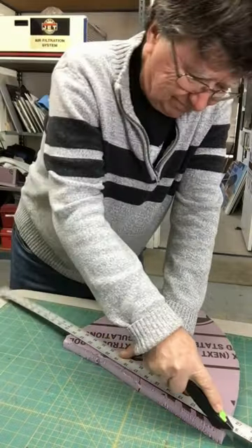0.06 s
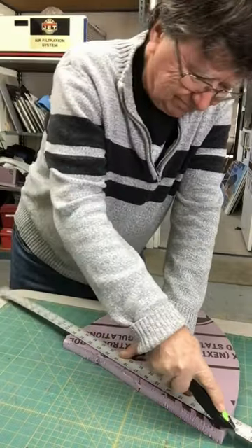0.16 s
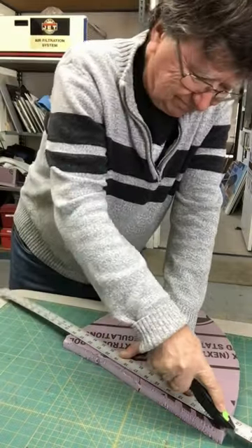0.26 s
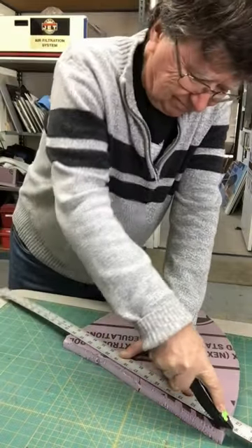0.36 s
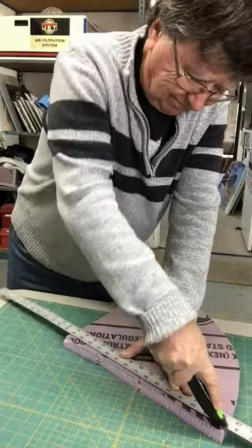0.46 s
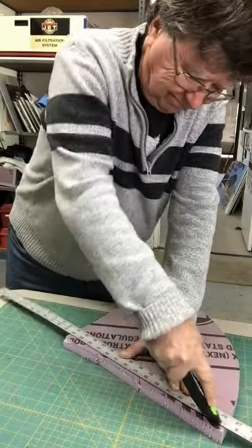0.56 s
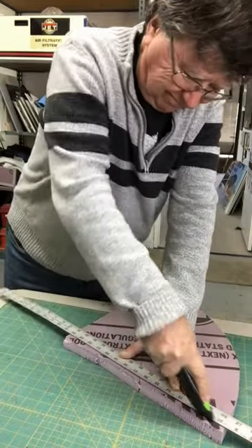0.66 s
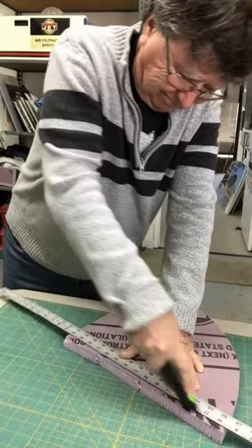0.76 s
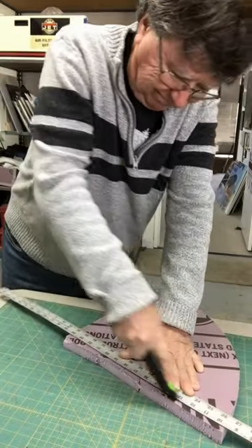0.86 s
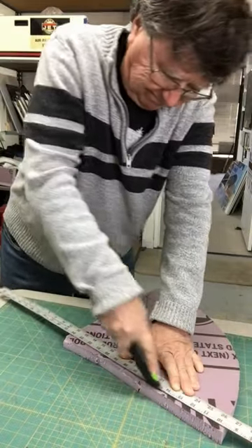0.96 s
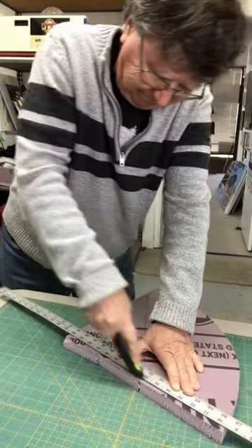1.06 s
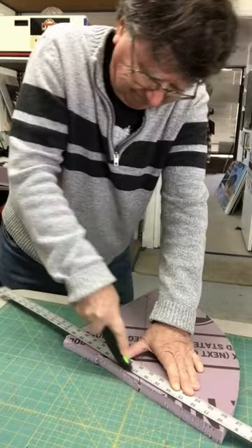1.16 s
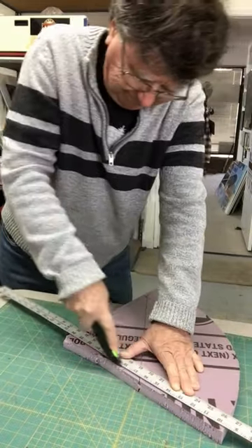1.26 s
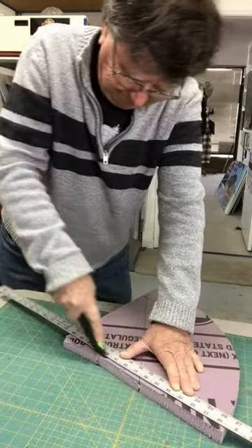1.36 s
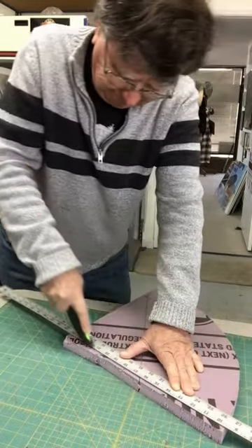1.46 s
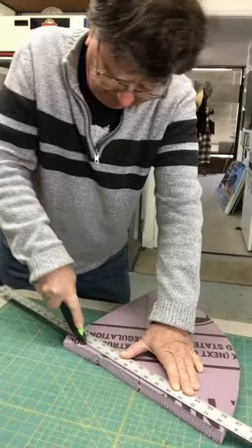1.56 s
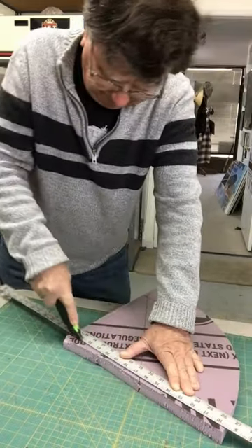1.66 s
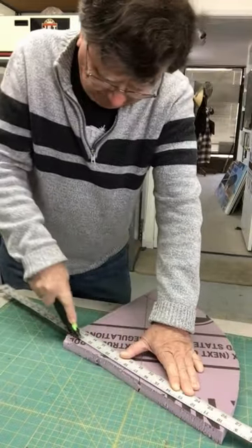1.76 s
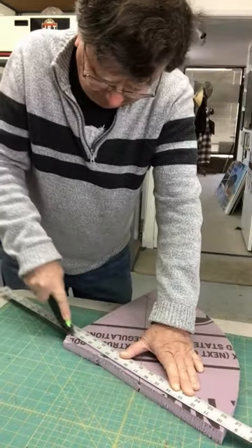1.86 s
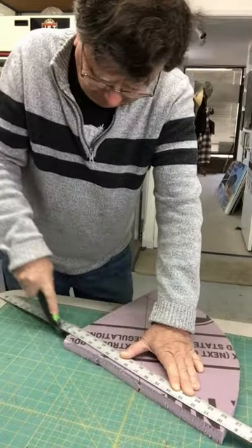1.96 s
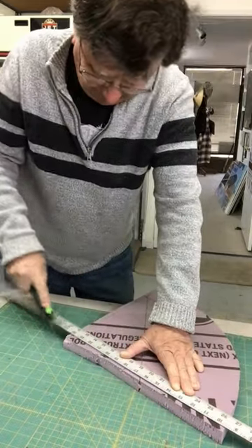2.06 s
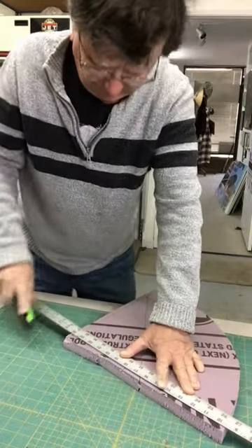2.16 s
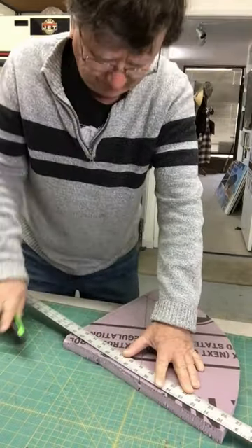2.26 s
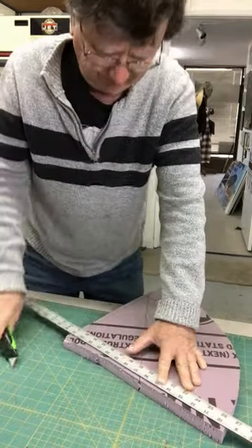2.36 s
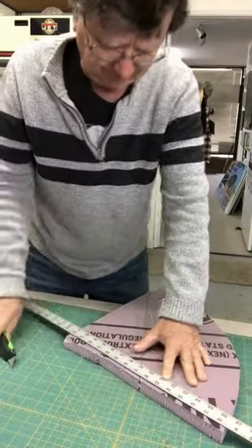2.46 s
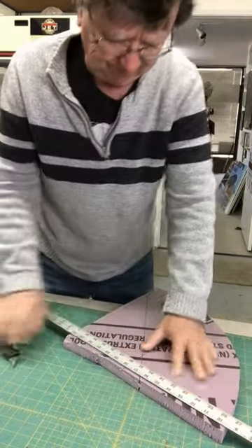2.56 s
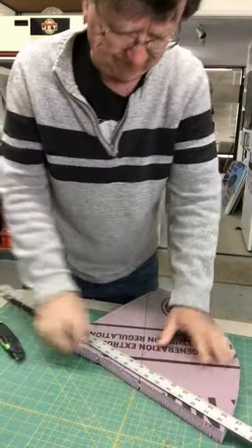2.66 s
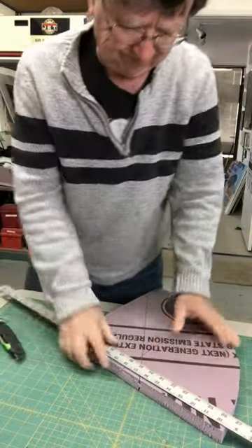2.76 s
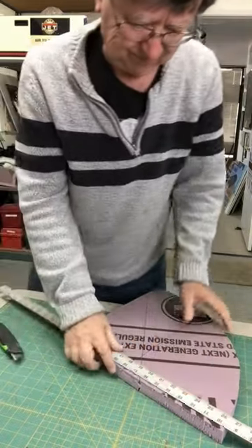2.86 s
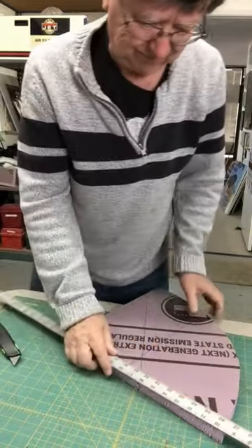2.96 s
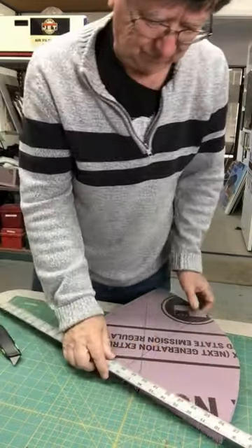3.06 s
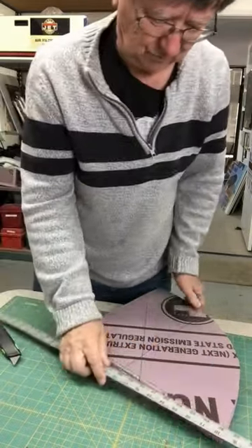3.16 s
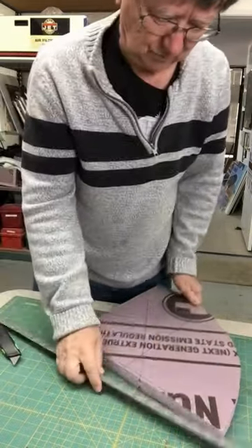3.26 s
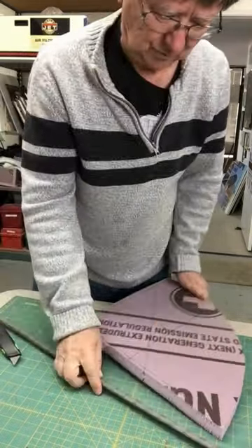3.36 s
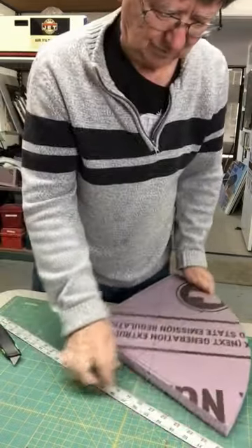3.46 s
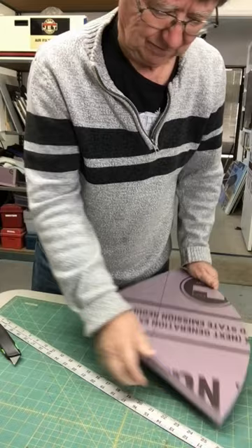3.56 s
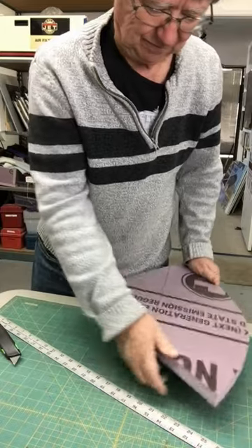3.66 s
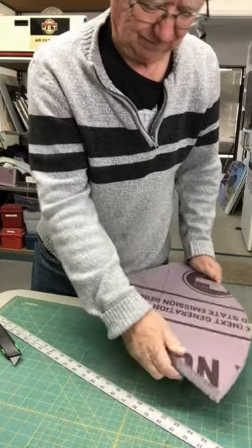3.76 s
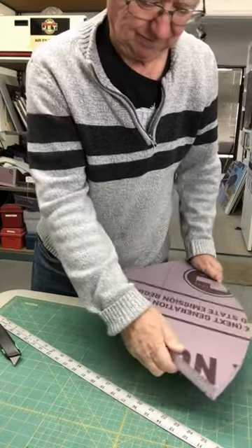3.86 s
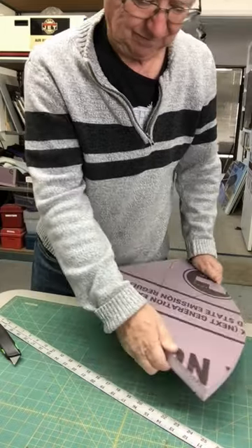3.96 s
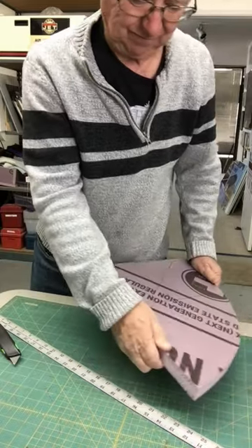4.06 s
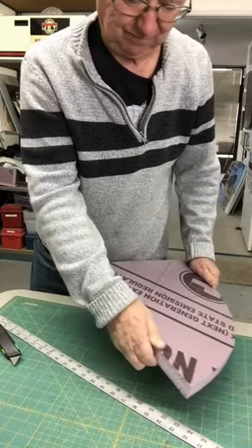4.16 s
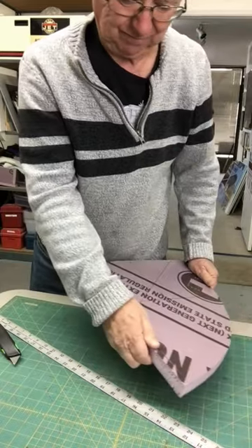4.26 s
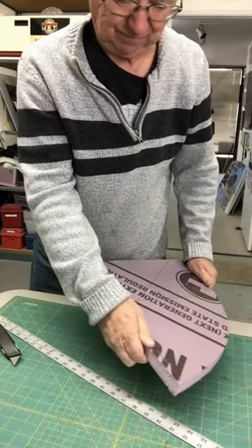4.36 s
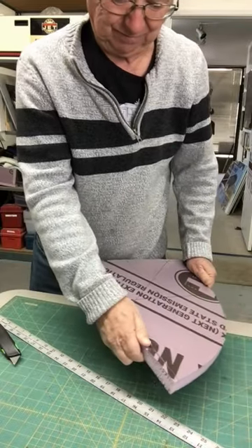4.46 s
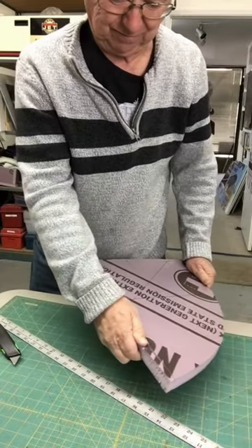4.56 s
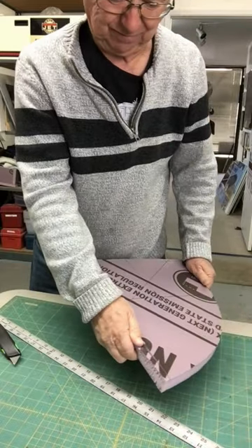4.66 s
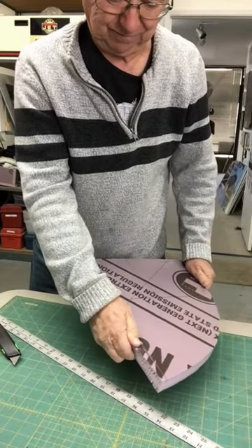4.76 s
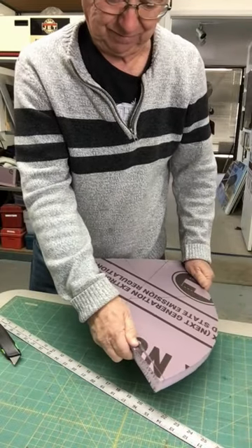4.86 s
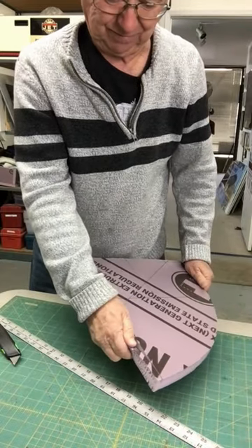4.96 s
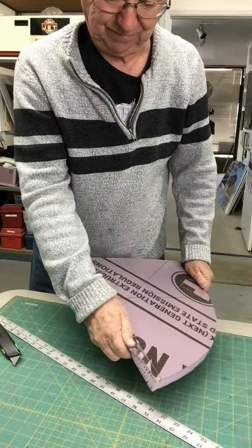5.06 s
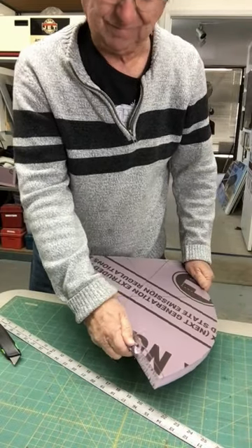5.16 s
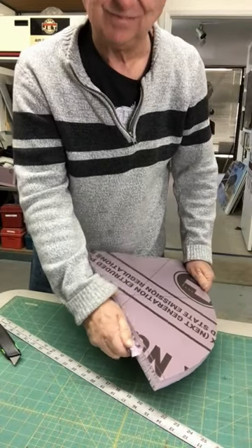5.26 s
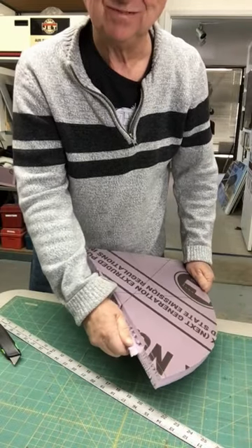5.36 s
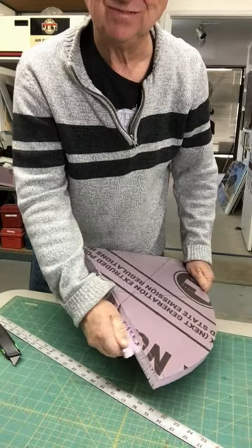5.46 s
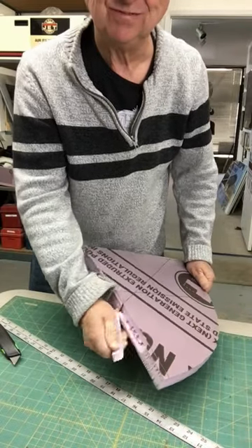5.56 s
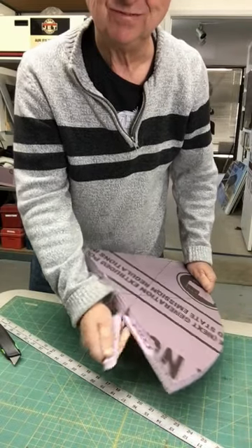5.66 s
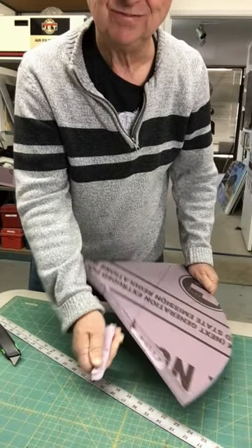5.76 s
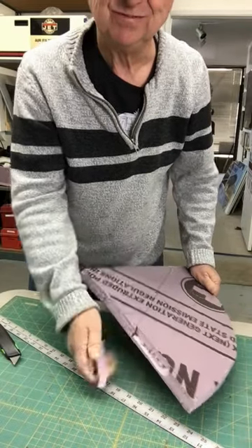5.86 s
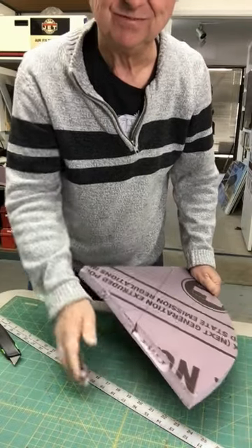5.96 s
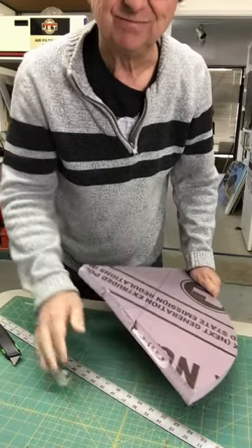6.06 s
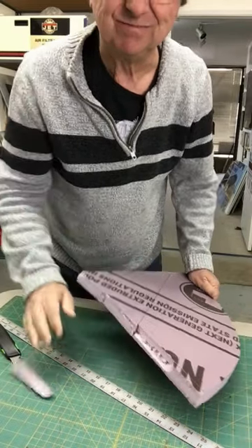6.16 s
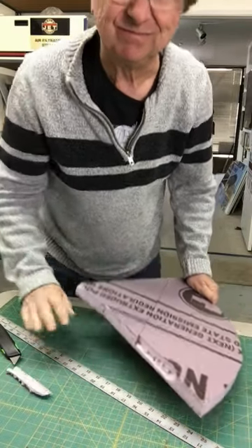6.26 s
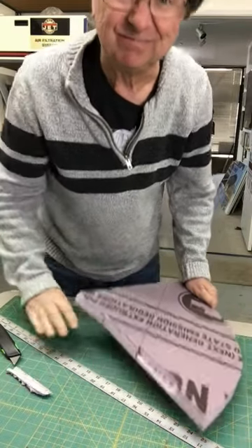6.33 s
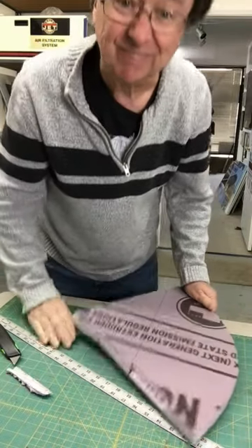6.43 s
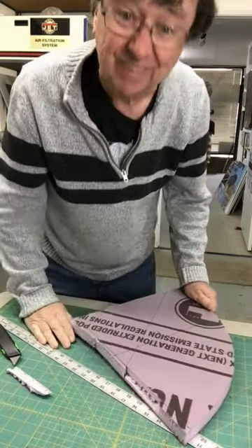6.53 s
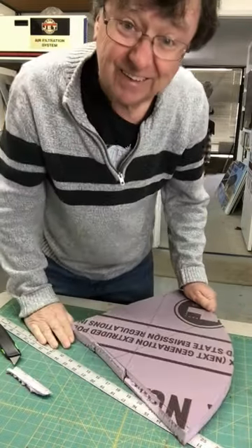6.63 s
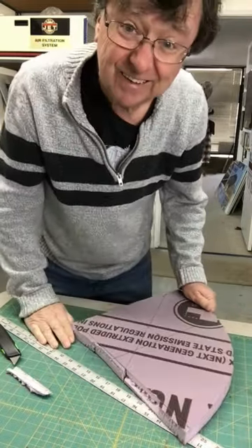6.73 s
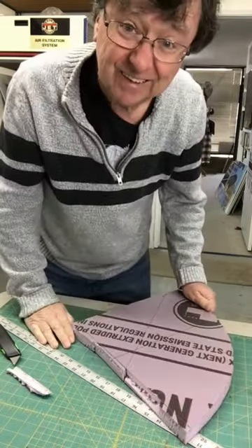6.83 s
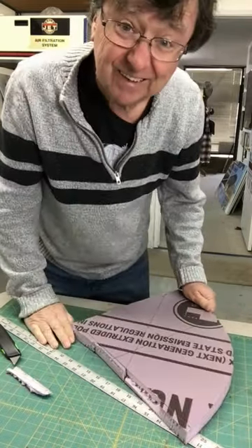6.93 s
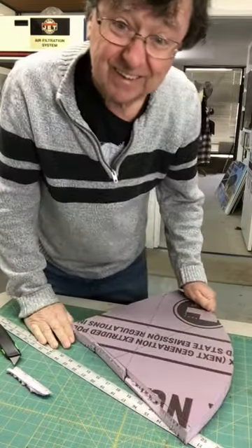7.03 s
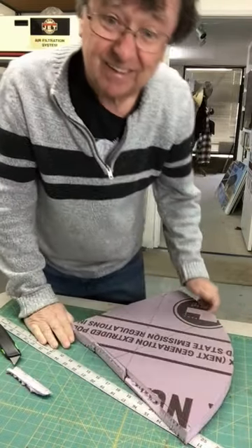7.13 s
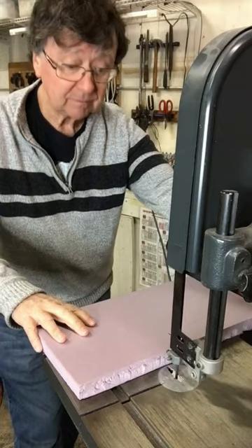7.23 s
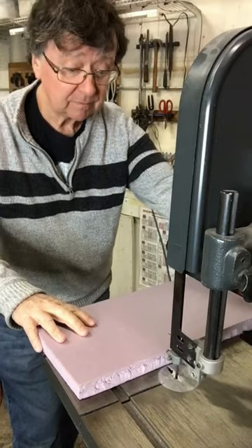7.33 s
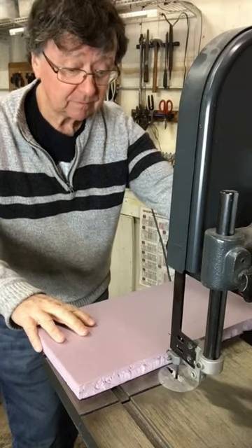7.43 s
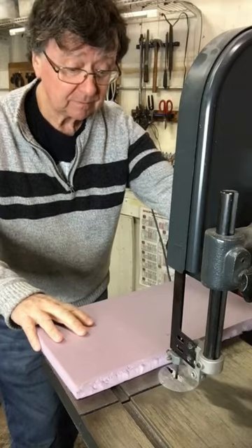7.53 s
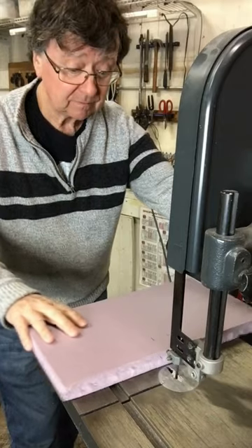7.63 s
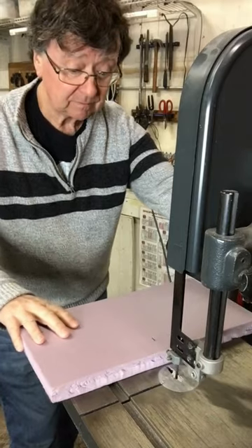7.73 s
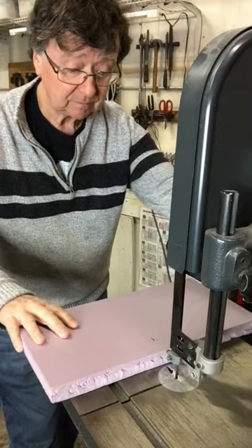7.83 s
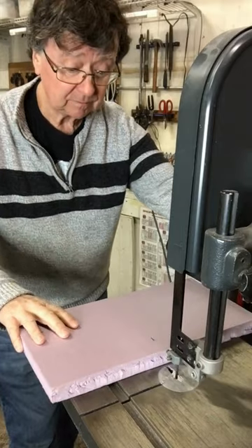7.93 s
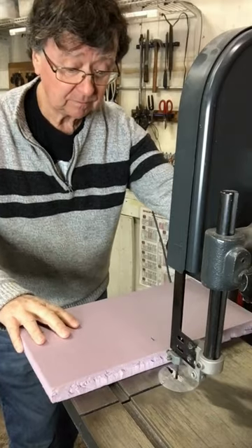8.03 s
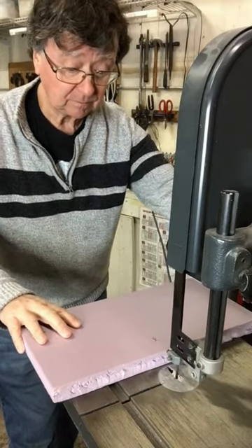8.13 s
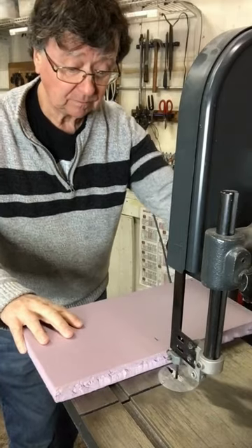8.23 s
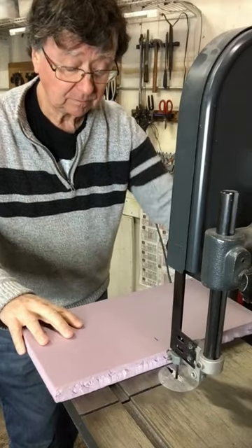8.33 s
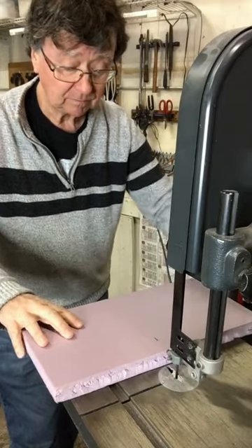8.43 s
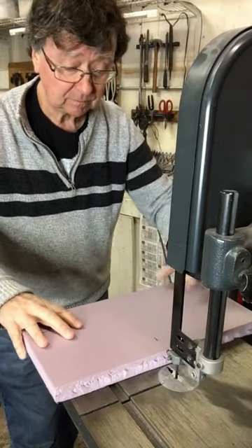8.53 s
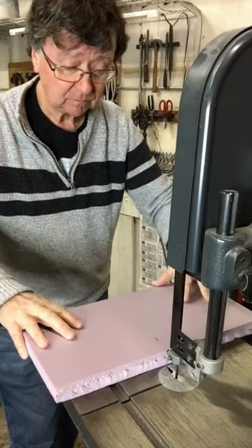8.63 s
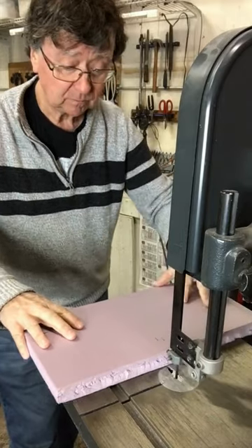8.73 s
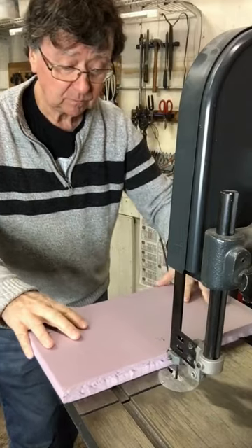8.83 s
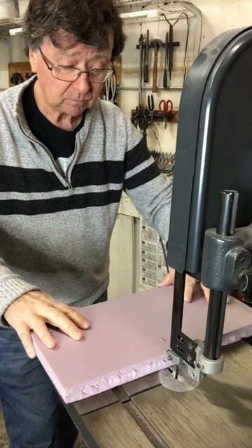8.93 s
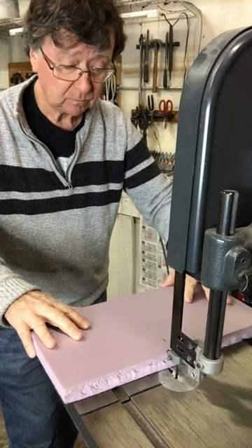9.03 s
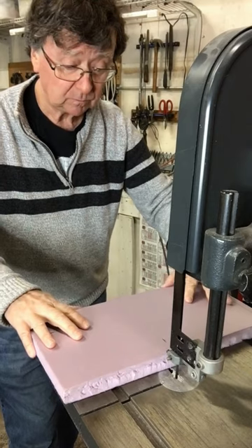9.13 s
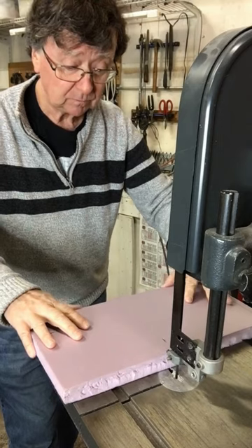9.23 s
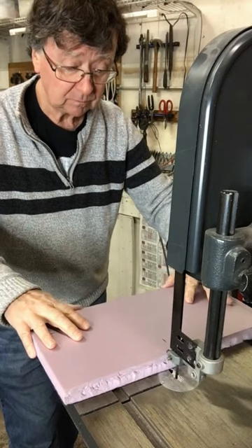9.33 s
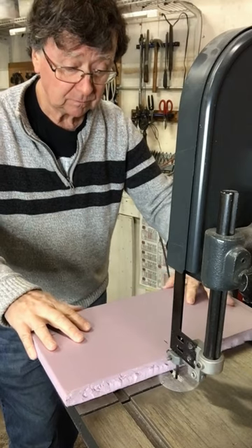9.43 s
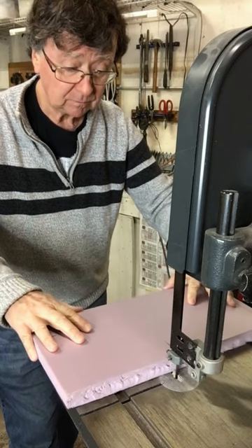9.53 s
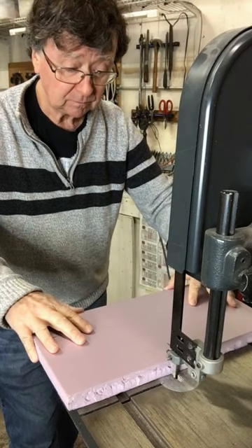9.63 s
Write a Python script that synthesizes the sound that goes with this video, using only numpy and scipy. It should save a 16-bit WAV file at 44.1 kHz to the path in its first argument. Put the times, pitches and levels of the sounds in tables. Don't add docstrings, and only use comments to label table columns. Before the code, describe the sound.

Close in a small, dry workshop, a knife hisses and crackles through foam board along a steel rule while the hollow table rumbles. Knife and rule land with hard knocks. After quiet handling, a strip snaps sharply, creaks and tears away, followed by tiny metal clinks. A cut leads to foam sliding on iron, then a switch clacks and a bandsaw runs up into a steady metallic rattle.

```python
import sys
import numpy as np
from scipy import signal
from scipy.fft import rfft, irfft, next_fast_len
from scipy.io import wavfile
from scipy.ndimage import uniform_filter1d

SR = 44100
rng = np.random.default_rng(int(sys.argv[2]) if len(sys.argv) > 2 else 0)


def ratio_of_db(decibels):
    return 10 ** (np.asarray(decibels, float) / 20)


def generate_wav(signal):
    frames = np.transpose(np.atleast_2d(signal))
    scaled = np.clip(frames, -1, 1) * 32767
    pcm = np.round(scaled).astype(np.int16)
    wavfile.write(sys.argv[1], SR, pcm)


N = 427329

SET_ASIDE_S = 3.64
LIFTED_S = 4.2
SNAP_S = 5.068
PUT_BACK_S, PUT_BACK_END_S = 6.36, 6.75
SWITCH_S = 8.121

# [f/Hz, level/dB]
CELL_TONE = [(820, -45.5), (1400, -20), (1560, -11), (1780, -4.5), (2640, 1), (4790, 4.5), (5570, -0.5),
             (6480, -7.5), (7710, -13), (8500, -16), (11000, -49), (18700, -120)]
FIZZ_TONE = [(4410, -53), (7500, -4), (8960, -17.5), (10300, -0.5), (11600, 2), (12800, -5.5),
             (14000, -13.5), (15300, -15), (16000, -20)]
BOARD_TONE = [(250, -35), (420, -20), (461, -7), (736, -5), (914, -2), (1020, -3.5), (1700, -4.5),
              (2210, -12), (3740, -120)]
TABLE_TONE = [(15, -57), (25, -34.5), (43, -25), (86, -15), (168, 0), (228, -5), (309, -8), (351, -9.5),
              (383, -11), (520, -17), (680, -36), (1140, -120)]
HELD_TONE = [(24, -71.5), (40, -45), (59, -36), (113, -19), (220, -9.5), (290, -6), (320, -2), (365, -3.5),
             (389, -14.5), (520, -14.5), (680, -48), (1140, -120)]
BLADE_TONE = [(760, -35), (1300, -14.5), (1790, -18), (1920, 0), (2660, -5), (3190, -6.5), (5030, -4),
              (8000, -31), (10400, -66), (17600, -120)]
WHEEL_TONE = [(18, -83), (30, -55), (187, -13), (248, -0.5), (483, -4), (795, -12.5), (971, -11),
              (1600, -14.5), (2080, -26), (3520, -120)]
GUIDE_TONE = [(6500, -6), (7400, -33), (8600, -6.5), (10000, 4), (11000, 5), (12100, -5), (12500, -22),
              (15900, -35)]
SHOP_TONE = [(35, -56), (60, -35), (312, -2), (673, -9.5), (2710, -22), (2980, -21), (4420, -37),
             (8280, -20.5), (11200, -19), (15500, -25)]

# [f/Hz, width/Hz, level/dB]
TABLE_MODES = [(167.2, 14, 2), (276, 8.7, -10), (393, 12, -18), (128, 38, -22)]
IRON_MODES = [(358, 14, -7.5), (846, 25, -6.5), (1150, 9.8, -7), (1318, 19, -7.5), (1820, 280, -6.5),
              (2500, 36, -13)]
RULE_MODES = [(1180, 36, -4), (2070, 48, -12), (2460, 30, -13), (2880, 62, 1), (3520, 34, 10.5),
              (4100, 41, -8)]
FRAME_MODES = [(1923, 11, -4.5), (1952, 22, -6), (2440, 22, -9), (2160, 10, -18), (2270, 24, -6),
               (2360, 25, -7), (2885, 49, -3.5), (3168, 31, -8.5), (3150, 57, -5), (3230, 40, -13),
               (4340, 41, -11.5), (4480, 43, -12.5)]
CABINET_MODES = [(248.2, 4.5, 4.5), (299, 15, -3), (375, 17, -21), (412.4, 12, 6.5), (472, 11, 0.5),
                 (537, 23, -7), (645, 13, -3), (728, 8.1, -6), (993, 7, -4.5), (1245, 46, -13)]
# [f/Hz, width/Hz, level/dB, time to fall 60 dB/s]
STRIP_MODES = [(903, 70, -32, 0.46), (1130, 60, -35.5, .25), (5140, 590, -27.5, 0.42)]

# [peak t/s, foam tearing level/dB, table weight relative level/dB, 20 dB rise/s, 20 dB fall/s]
KNIFE = [
    (0, -51.5, 2.5, .1, 0.3),
    (.402, -48, -1.5, 0.13, .5),
    (.7, -44.5, 2, 0.23, 1),
    (.9, -42, 5, .5, 0.22),
    (1.089, -37, 9, 0.15, 0.1955),
    (1.36, -45.5, 5, 0.9, 1),
    (1.8, -48.5, 0.5, -0.5, 0.33),
    (1.885, -43, -3, 0, 0.06),
]
SET_DOWN = [(.158, -54.5, 12.5, 0.018, 0.23), (1.934, -42, 8, 0.033, 0.16), (2.318, -56, 12.5, 0.023, 0.27),
            (2.365, -48, 1, 0.073, 0.25), (2.478, -45, 11, 0.043, 0.28), (2.62, -54.5, 21.5, 0.073, 0.083),
            (3.362, -38.5, 3, 0.019, 0.19), (3.405, -36.5, -4, 0.043, 0.2),
            (6.37, -49.5, -5, 0.0087, 0.067), (6.452, -46.5, 5.5, 0.031, 0.17),
            (6.62, -64, 3.5, 0.16, 0.67)]
RULE_SLIDES = [
    (2.878, -47, -17, 0.31, 1.54),
    (3.18, -40, -4, 0.3, 0.24),
    (3.292, -34, 3.5, 0.012, 0.049),
    (3.626, -41, -19, 0.033, 0.083),
    (3.74, -49.5, -6, 0.051, 0.11),
    (3.862, -50, -11, 0.34, 0.18),
]
BENDING = [
    (4.27, -64.5, -20, 0.1, 3.9),
    (4.85, -73.5, 1.5, 1, 0.59),
    (5.05, -75, 5, 0.13, .03),
    (6.214, -65, 3, 0.22, 0.32),
    (7.008, -63, -2, 0.07, 0.33),
    (7.262, -62, 0.5, 0.018, 0.25),
    (7.35, -64, -6, 0.037, 0.091),
]
TEARING = [
    (5.078, -36.5, -13.5, 0.019, 0.51),
    (5.26, -39.5, -44, 0.28, 0.054),
    (5.488, -37.5, -34, 0.042, 0.11),
    (5.66, -42.5, -28, 0.12, 0.23),
]
ON_IRON = [
    (7.525, -42, -10, 0.017, 0.52),
    (7.7, -43.5, -12, 0.17, 0.16),
]
# [gestures, (fizz relative level/dB, board relative level/dB,
#                    steepness of fizz, of board, of table rumble)]
KINDS = [
    (KNIFE, (-2, -19, 1.5, 0.95, 1.46)),
    (SET_DOWN, (-9.5, -6.5, 1.3, 0.83, 0.94)),
    (RULE_SLIDES, (-9, -12, 1.4, 0.77, 0.56)),
    (BENDING, (-8, -7.5, 1, 0.7, 0.4)),
    (TEARING, (-9, -14, 1.6, 0.9, 2.5)),
    (ON_IRON, (-23, -3.5, 4, 0.8, .5)),
]

# [peak t/s, level/dB, rise/s, fall/s]
CRUMB_SPRAY = [
    (.74, -48, .15, 0.24),
    (.945, -34, 0.041, 0.052),
    (5.48, -41.5, 0.058, 0.089),
    (5.76, -56, .04, .05),
    (5.86, -56, .04, 0.023),
    (7.7, -49, 0.16, 0.14),
]
BOARD_BOOMS = [
    (5.078, -38.5, 0.0094, 0.21),
    (7.88, -54.5, 0.29, 0.38),
]
LEANING = [(.55, -45, 0.08, .1), (1.125, -34, .05, .04), (1.36, -38.5, 0.13, 0.11),
           (2.22, -49.5, 0.43, 0.13), (2.8, -45, 0.13, 0.088), (3.45, -31, 0.13, 0.18),
           (3.86, -57, 0.41, 0.36), (4.75, -65, 0.39, 0.9), (5.55, -61.5, 0.4, 0.6),
           (5.93, -62.5, 0.39, 0.31), (6.64, -70, .25, 0.36), (7.75, -53, 0.15, 0.42)]
FRAME_JOLTS = [
    (8.122, -35, .01, 0.12),
    (9.69, -34, .05, .1),
]
MOTOR_STRAIN = [
    (8.3, -32.5, 0.27, 1),
    (8.41, -30.5, 0.04, .07),
    (9.69, -35, 0.054, .1),
]
GUIDE_SLAPS = [
    (8.122, -48, .01, 0.051),
    (8.19, -45, 0.022, .065),
    (8.41, -35, 0.023, 0.032),
]

# [t/s, peak level/dB, centre f/Hz]
BURSTS = [(.6524, -50, 4470), (.7116, -25.5, 3400), (.9305, -31, 3150), (.9562, -14, 2760),
          (1.0884, -29, 4780), (1.1035, -25, 5000), (1.7802, -42, 4340), (3.6232, -30, 3370),
          (5.017, -60.5, 3680), (5.066, -12.5, 4500), (5.068, -19, 1040), (5.0688, -17.5, 5000),
          (7.5153, -54, 4010)]
# [t/s, peak level/dB, centre f/Hz]
TICKS = [(.114, -38, 3280), (.851, -22.5, 3000), (1.2336, -32.5, 2830), (1.3336, -27, 3070),
         (1.4368, -38, 5420), (1.8925, -26.5, 3800), (2.3526, -31, 4530), (2.6251, -33.5, 3130),
         (3.0729, -33, 3970), (3.7363, -38, 3020), (4.576, -41.5, 3660), (5.087, -21, 5180),
         (5.2175, -24.5, 3230), (5.6587, -23, 3150)]
# [t/s, peak level/dB, centre f/Hz, thud relative level/dB]
KNOCKS = [(.149, -31, 2460, -1.5), (.883, -34, 4090, 2), (1.9231, -21, 4000, -10),
          (1.9541, -28, 3500, -5.5), (2.313, -59.5, 1500, 19.5), (2.4692, -40.5, 4200, 12.5),
          (3.1771, -32, 2720, 1.5), (3.2845, -10.5, 2330, -10), (3.3523, -20.5, 2420, -11),
          (3.3972, -20, 2360, -8.5), (3.401, -20, 2500, -6), (3.4075, -18, 2240, -7),
          (3.4197, -25, 2230, -1), (4.355, -46.5, 1040, -5), (6.362, -45, 4310, -9), (6.4322, -44, 1200, 2),
          (6.4451, -42, 2200, 5), (6.7326, -52, 4990, -11), (7.3372, -47, 1870, -2)]
# [t/s, peak level/dB, centre f/Hz]
THUMPS = [
    (1.925, -38, 560),
    (2.472, -28.5, 420),
    (2.63, -40, 398),
    (3.405, -29, 397),
]
# [t/s, peak level/dB]
RULE_CLINKS = [
    (6.1435, -46),
    (6.177, -42.5),
    (6.2144, -48),
    (6.243, -51),
    (6.272, -47.5),
    (6.3034, -50),
]
# [t/s, peak level/dB, centre f/Hz, thud relative level/dB]
CLACKS = [
    (8.121, -27, 2630, -23),
    (8.122, -31.5, 4400, -22),
    (8.196, -44, 2120, 9),
    (8.407, -23, 5180, -16),
    (8.41, -32, 3150, -19),
]
# [peak t/s, level/dB, centre
# f/Hz, rise/s, fall/s]
CRUNCHES = [(.41, -45.5, 4760, .06, .1), (.56, -49.5, 3560, 0.024, .04), (.66, -45, 4300, .015, .04),
            (.79, -47, 3050, .02, .04), (1.105, -32, 4300, .02, 0.021), (1.18, -48, 3570, .02, .04),
            (1.275, -45, 4080, .015, .04), (1.313, -43, 3860, .01, .03), (1.8, -46, 4310, 0.023, .08),
            (1.892, -37, 4380, .012, .012), (1.956, -40, 4300, .005, 0.018), (2.77, -50, 2430, .015, .04),
            (2.885, -45, 2650, .03, .03), (2.93, -44, 4900, .04, .05), (2.975, -43, 4300, .015, .02),
            (3.1, -39, 4500, .05, 0.054), (3.13, -47, 1050, 0.07, .04), (3.285, -24.5, 4870, .002, .012),
            (3.353, -32, 4630, .003, .02), (3.405, -31.5, 2330, .012, 0.057),
            (5.067, -21, 4960, .003, .012), (5.088, -28, 5300, .005, .012), (5.12, -33, 950, 0.027, .03),
            (5.172, -31.5, 4780, .012, .01), (5.219, -29.5, 3300, .01, 0.011), (5.255, -38, 4100, .02, .03),
            (5.28, -40, 3200, .015, .02), (5.455, -46, 4340, .008, .04), (5.489, -33.5, 4600, .012, .015),
            (5.53, -47, 3300, .03, .03), (5.659, -30, 3100, .006, .01), (5.674, -35, 3600, .012, .015),
            (5.72, -47, 4500, .04, 0.038), (6.144, -55, 1150, .003, .03), (6.145, -54, 3750, .003, .015),
            (6.168, -60, 800, .008, .015), (6.265, -60, 5500, .005, .012), (6.365, -51, 4750, .004, .02),
            (6.46, -43, 4900, .012, .02),
            (.93, -41, 13500, .02, .015), (.76, -51, 12400, .09, .09), (1.11, -46, 7100, .03, .06),
           (1.5, -48, 6900, 0.084, .06), (1.885, -50, 13000, .03, .015), (1.73, -53, 6500, .05, .05),
           (2.33, -34, 4600, .003, .015), (2.3, -50, 8200, 0.026, 0.022), (2.35, -53, 12300, .04, .03),
           (3.3, -43, 11000, .008, .008), (3.44, -38.5, 1300, .03, 0.057), (4.1, -66, 12000, 0.1, .09),
           (5.03, -30.5, 1530, .003, 0.027), (5.03, -36, 11500, .003, 0.026), (5.1, -40, 5800, .02, .06),
           (5.19, -43, 860, .02, 0.057), (5.13, -41, 1500, .03, 0.057), (5.673, -43, 7500, 0.013, .012),
           (5.673, -43, 12000, .012, .015), (5.8, -55.5, 1130, .05, 0.044), (5.67, -52, 1150, .03, .03),
           (5.07, -30.5, 2170, .003, 0.036), (6.3, -58, 3200, .01, .02), (6.275, -55, 3500, .012, .015),
           (8.124, -34, 2600, .002, .025), (8.125, -39, 4600, .002, .04)]

# [f/Hz, share]
BAND_LOSS = [(4800, 0), (6300, .22), (7500, .28), (10500, .1), (12300, .28), (13500, .07)]
HUSHES = [
    .948,
    1.908,
    1.944,
    2.46,
    3.268,
    3.275,
    3.31,
    3.34,
    3.386,
    6.353,
]
# [t/s, half length/s]
CUTS = [
    (7.248, 0.011),
    (8.11, 0.0065),
]


def colour(x, points):
    hz, db = np.transpose(points)
    size = next_fast_len(len(x))
    f = np.arange(size // 2 + 1) * SR / size + 1
    gain = ratio_of_db(np.interp(np.log(f), np.log(hz), db, -90, -90))
    y = irfft(rfft(x, size) * gain, size)[:len(x)]
    return y / y.std()


def ring(x, modes):
    y = 0
    for hz, width, db in modes:
        y = y + ratio_of_db(db) / np.sqrt(width) * signal.lfilter(*signal.iirpeak(hz, hz / width, SR), x)
    return y / y.std()


def band_pass(x, low_hz, high_hz):
    return signal.sosfilt(signal.butter(2, [low_hz, high_hz], "band", fs=SR, output="sos"), x)


def mix(a, b, share):
    share = np.clip(share, 0, 1)
    return np.sqrt(1 - share) * a + np.sqrt(share) * b


def walk(rate):
    hold = int(SR / rate)
    steps = np.repeat(rng.standard_normal(N // hold + 1), hold)
    return uniform_filter1d(steps, hold)[:N]


def grains(rate, spread_db, tail_s):
    when = rng.random(N) < rate / SR
    size = ratio_of_db(spread_db * np.minimum(rng.exponential(size=N), 3))
    return signal.lfilter([1], [1, -np.exp(-1 / (tail_s * SR))], when * size)


def swell(rows, steep=1):
    t = np.arange(0, N + 64, 64) / SR
    power = 0
    for s, db, rise, fall in rows:
        away = np.where(t < s, (s - t) / max(rise, .003), (t - s) / max(fall, .003))
        power = power + ratio_of_db(db - 20 * steep * away) ** 2
    return np.interp(np.arange(N) / SR, t, np.sqrt(power))


def shop_air():
    return ratio_of_db(-71.5) * colour(rng.standard_normal(N), SHOP_TONE)


def effort():
    power = np.array([np.zeros(N), swell(CRUMB_SPRAY), swell(BOARD_BOOMS), swell(LEANING)]) ** 2
    for rows, (fizz_db, body_db, fizz_steep, body_steep, table_steep) in KINDS:
        drag = [(s, db, rise, fall) for s, db, _, rise, fall in rows]
        weight = [(s, db + rel_db, rise, fall) for s, db, rel_db, rise, fall in rows]
        fizz = ratio_of_db(fizz_db) * swell(drag, fizz_steep)
        body = ratio_of_db(body_db) * swell(drag, body_steep)
        power = power + np.array([swell(drag), fizz, body, swell(weight, table_steep)]) ** 2
    return np.sqrt(power)


def rubbing():
    cells, fizz, board, table = effort()
    t = np.arange(N) / SR
    jerk = ratio_of_db(1.4 * walk(30))
    tear = jerk * (1 + 0.43 * grains(450, 2.9, 0.0019)) * rng.standard_normal(N)
    shake = ratio_of_db(2.55 * walk(18)) * rng.standard_normal(N)

    ringing_share = np.where((t > SET_ASIDE_S) & (t < LIFTED_S), .93, .49)
    wood = mix(colour(shake, TABLE_TONE), ring(shake[::-1], TABLE_MODES), ringing_share)
    off_table = (t > LIFTED_S) & ((t < PUT_BACK_S) | (t > PUT_BACK_END_S))
    rumble = np.where(off_table, colour(shake, HELD_TONE), wood)

    iron = ring(rng.standard_normal(N), IRON_MODES)
    body = mix(colour(tear, BOARD_TONE), iron, 0.55 * (t > CUTS[0][0]))

    patches = 0
    for hz in np.geomspace(2300, 6800, num=11):
        patches = patches + ratio_of_db(6.3 * np.clip(walk(16), -2, 1.3)) * ring(tear, [(hz, hz / 22, 0)])
    torn = mix(colour(tear[::-1], CELL_TONE), colour(patches, CELL_TONE), .55)

    hiss = 0
    for hz in np.linspace(7500, 15500, num=7):
        hiss = hiss + ratio_of_db(1.2 * walk(25)) * ring(tear, [(hz, 900, 0)])
    return cells * torn + fizz * colour(hiss, FIZZ_TONE) + board * body + table * rumble


def hits(rows, spread, fizz_db, t60, thud_db=0, in_hand_db=0):
    out, t = np.zeros(N + 4096), np.arange(4096) / SR
    thud_modes = [(174, 93, -3.0), (374, 150, -0.5), (619, 124, -6.5), (950, 220, -5.5)]
    for (s, db, hz, *heavy_db), noise in zip(rows, rng.standard_normal((len(rows), len(t)))):
        burst = noise * .25 * np.exp(-np.log(1000) * t / t60) + (t == 0) * 3
        crack = band_pass(burst, hz / spread, min(hz * spread, 7500))
        fizz = band_pass(burst, 9000, 14500)
        thud = ring(noise * np.exp(-t / 0.0034), thud_modes)
        thud_level_db = thud_db + sum(heavy_db) - in_hand_db * (s > LIFTED_S)
        for part, rel_db in ((crack, 0), (fizz, fizz_db), (thud, thud_level_db)):
            out[int(s * SR):][:len(t)] += ratio_of_db(db + rel_db + 4) * part / np.abs(part).max()
    return out[:N]


def breaks():
    bursts = hits(BURSTS, spread=1.37, fizz_db=-3.5, t60=0.031, thud_db=-19, in_hand_db=8)
    return bursts + hits(TICKS, spread=1.305, fizz_db=-19, t60=0.037, thud_db=-18.5, in_hand_db=9)


def blows():
    knocks = hits(KNOCKS, spread=1.54, fizz_db=-9, t60=0.035)
    return knocks + hits(THUMPS, spread=1.276, fizz_db=-60, t60=0.21, thud_db=-30)


def crunches():
    out, t = np.zeros(N), np.arange(-4096, 4096) / SR
    rows, spread = CRUNCHES, 1.14
    for (s, db, hz, rise, fall), (noise, size) in zip(rows, rng.standard_normal((len(rows), 2, len(t)))):
        grain = ratio_of_db(4.0 * np.repeat(size, 64)[:len(t)])
        band = band_pass(grain * noise, hz / spread, hz * spread)
        shape = ratio_of_db(db - 20 * np.where(t < 0, -t / max(rise, .002), t / max(fall, .002)))
        out[int((s + t[0]) * SR):][:len(t)] += shape * band / band.std()
    return out


def strip():
    t = np.arange(N) / SR - SNAP_S
    slip = (1 + grains(55, 1.3, .004)) * rng.standard_normal(N)
    creak = 0
    for hz, width, db, t60 in STRIP_MODES:
        decay = np.exp(-np.log(1000) * np.abs(t) / t60)
        creak = creak + ratio_of_db(db) * decay * ring(slip, [(hz, width, 0)])
    return (t > 0) * creak


def clinks():
    out, t = np.zeros(N), np.arange(4096) / SR
    for s, db in RULE_CLINKS:
        spot = rng.standard_normal(len(RULE_MODES))
        modes = [(hz * (1 + .015 * k), 2.2 * width, .7 * mode_db + 2 * k)
                 for (hz, width, mode_db), k in zip(RULE_MODES, spot)]
        tap = ring(rng.standard_normal(len(t)) * np.exp(-t / .007), modes)
        out[int(s * SR):][:len(t)] += ratio_of_db(db - 2.0) * tap / np.abs(tap).max()
    return out


def clacks():
    return hits(CLACKS, spread=1.1, fizz_db=-19, t60=0.069)


def saw_levels():
    t = np.arange(N) / SR
    run_up_s, motor_bites_s, guides_join_s = .33, 0.073, 8.41
    speed = np.clip((t - SWITCH_S) / run_up_s, 0, 1)
    blade = np.hypot(ratio_of_db(-31.5 - 22.5 * (1 - speed) ** 1.27), swell(FRAME_JOLTS))
    bite = np.clip((t - SWITCH_S) / motor_bites_s, .25, 1)
    motor = bite * np.hypot(ratio_of_db(-38), swell(MOTOR_STRAIN))
    guides = np.hypot(ratio_of_db(-51.5 - 400 * np.maximum(guides_join_s - t, 0)), swell(GUIDE_SLAPS))
    return (t > SWITCH_S) * np.array([blade, motor, guides])


def bandsaw():
    blade, motor, guides = saw_levels()
    shaft_hz, frame_sings_s = 29.4, 0.13
    turn = 1 + 0.04 * np.sin(2 * np.pi * np.cumsum(shaft_hz * (1 + 0.052 * walk(6.2))) / SR)
    bites = 1 + 0.13 * grains(1000, 1.6, 0.00096)
    teeth = turn * ratio_of_db(1.36 * walk(60)) * bites * rng.standard_normal(N)
    drum = ratio_of_db(0.9 * walk(30)) * rng.standard_normal(N)
    singing = np.clip((np.arange(N) / SR - SWITCH_S) / frame_sings_s, 0, 1) ** 2
    frame = mix(colour(teeth, BLADE_TONE), ring(teeth[::-1], FRAME_MODES), 0.51 * singing)
    cabinet = mix(colour(drum, WHEEL_TONE), ring(drum[::-1], CABINET_MODES), 0.43)
    return blade * frame + motor * cabinet + guides * colour(teeth, GUIDE_TONE)


def room(x):
    t60_s, level_db = .4, -14
    t = np.arange(int(t60_s * SR)) / SR
    tail = rng.standard_normal(len(t)) * np.exp(-np.log(1000) * t / t60_s) * (t > .004)
    return x + ratio_of_db(level_db) * signal.fftconvolve(x, tail / np.sqrt(np.sum(tail ** 2)))[:N]


def thin_out(x):
    hz, when, cells = signal.stft(x, SR, nperseg=2048)
    chance = rng.random((len(hz) // 8 + 1, cells.shape[1] // 2 + 1))
    chance = np.repeat(np.repeat(chance, 8, axis=0), 2, axis=1)[:len(hz), :cells.shape[1]]
    touched = (when < SWITCH_S) | (hz[:, None] > 7000)
    share = np.interp(hz, *np.transpose(BAND_LOSS))[:, None] * touched
    uneven_db = 2.5 * np.minimum(share / 0.13, 1) * 4.2 * (chance - 0.65)
    keep = (chance > share) * ratio_of_db(uneven_db)
    return signal.istft(cells * keep, SR, nperseg=2048)[1][:N]


def hush(x):
    t = np.arange(N) / SR
    length_s, dip_db, above_hz = 0.0077, -23, 5800
    dip = np.max([np.clip(2 - 2 * np.abs(t - s) / length_s, 0, 1) for s in HUSHES], axis=0)
    treble = signal.sosfiltfilt(signal.butter(2, above_hz, "high", fs=SR, output="sos"), x)
    return x - (1 - ratio_of_db(dip_db)) * dip * treble


def scene():
    steady = thin_out(shop_air() + rubbing() + bandsaw())
    sharp = room(breaks() + blows() + crunches() + strip() + clinks() + clacks())
    mono = hush(steady + sharp)
    return np.array([mono, mono])


def band_limit(x):
    return signal.sosfilt(signal.butter(12, 16830, fs=SR, output="sos"), x)


def record(dry):
    t = np.arange(N) / SR
    fade = np.prod([np.clip(np.abs(t - s) / half, .02, 1) ** 2 for s, half in CUTS], axis=0)
    heard = signal.sosfilt(signal.butter(1, 101, "high", fs=SR, output="sos"), dry)
    heard = signal.sosfilt(signal.ellip(6, .3, 30, 15850, fs=SR, output="sos"), heard)
    return band_limit(heard * fade)


dry = scene()
out = record(dry)
generate_wav(out)
```